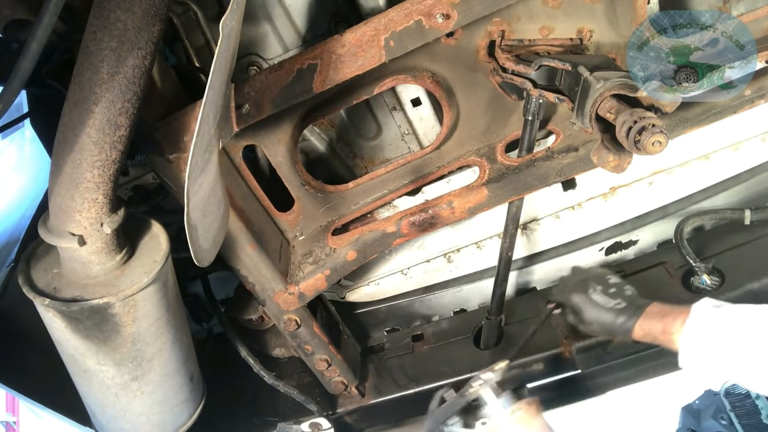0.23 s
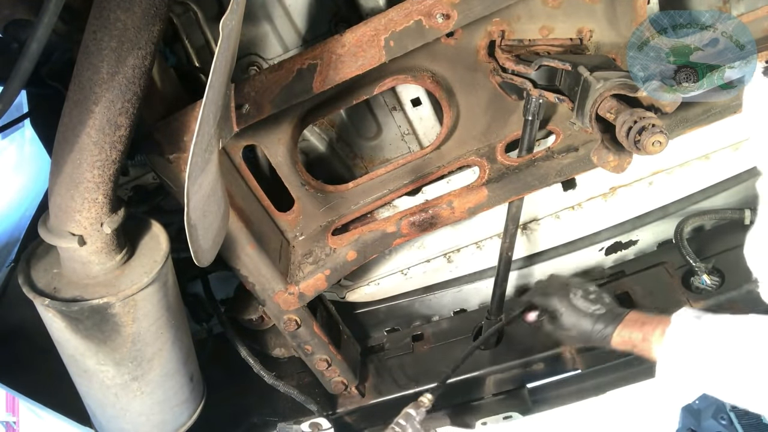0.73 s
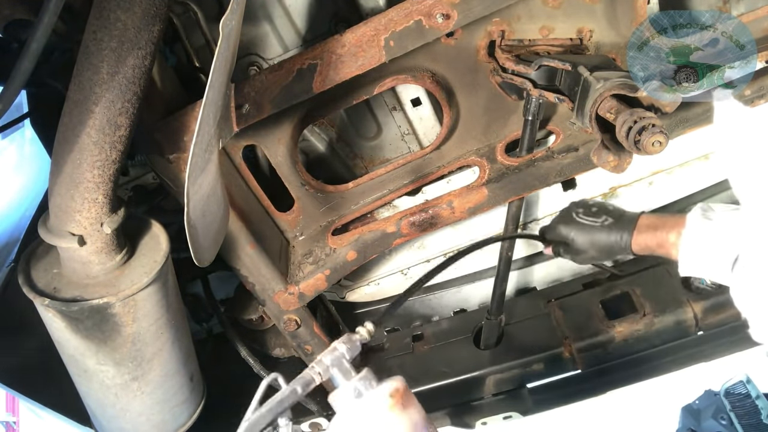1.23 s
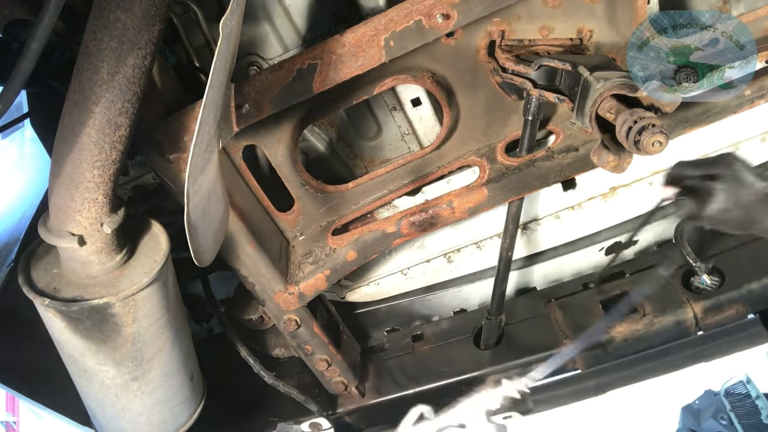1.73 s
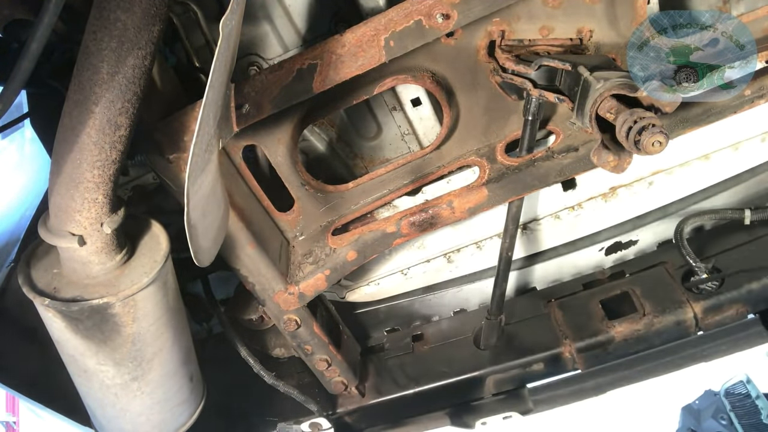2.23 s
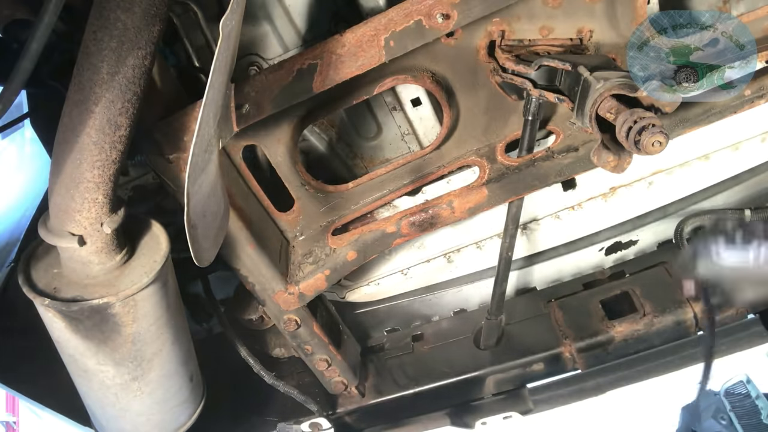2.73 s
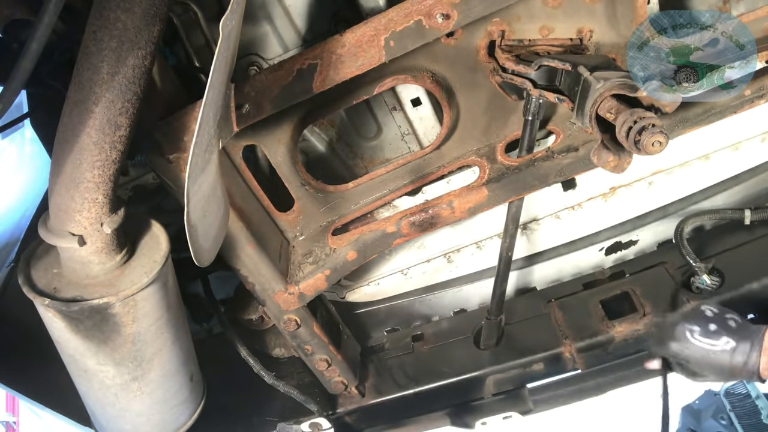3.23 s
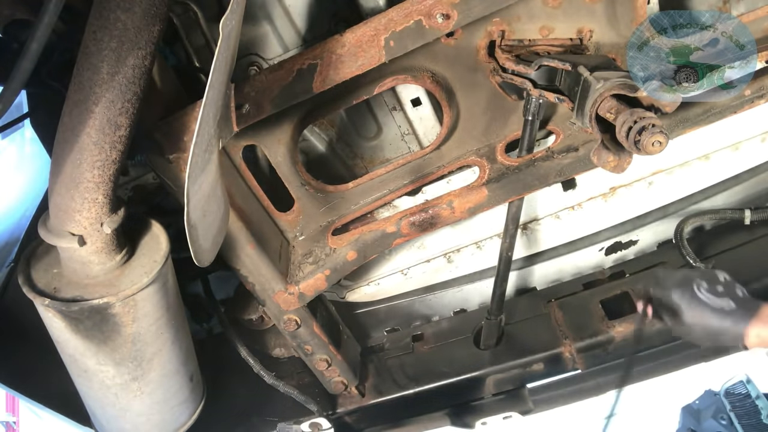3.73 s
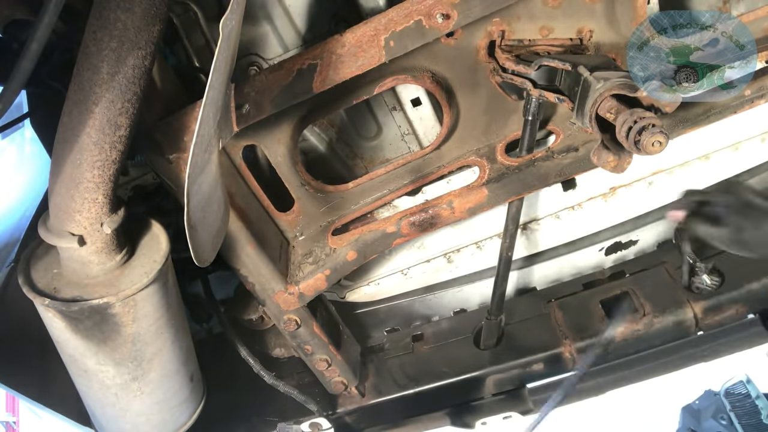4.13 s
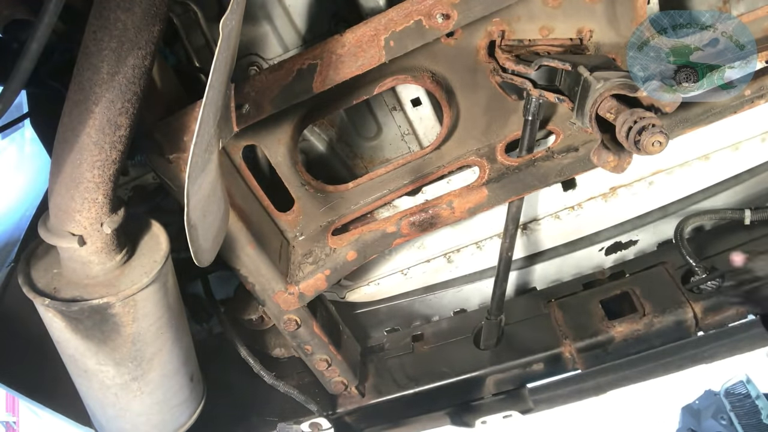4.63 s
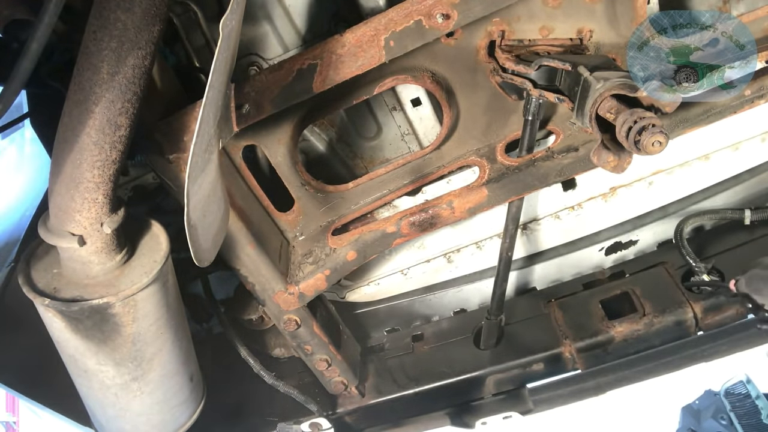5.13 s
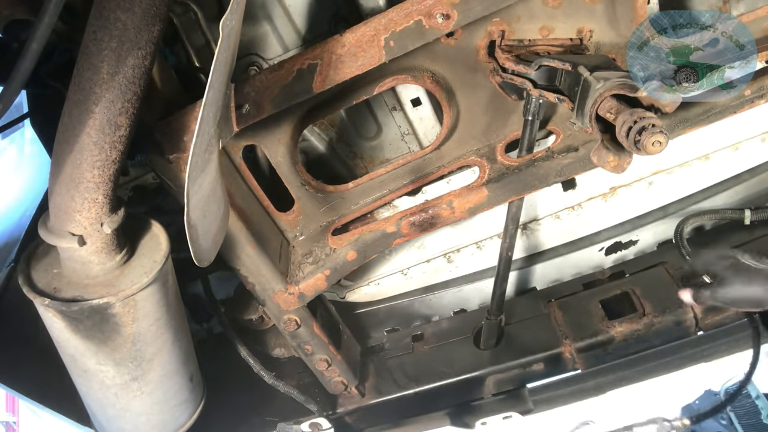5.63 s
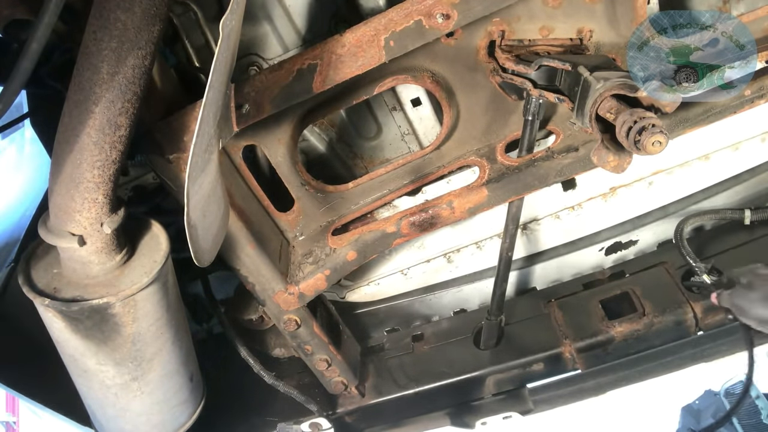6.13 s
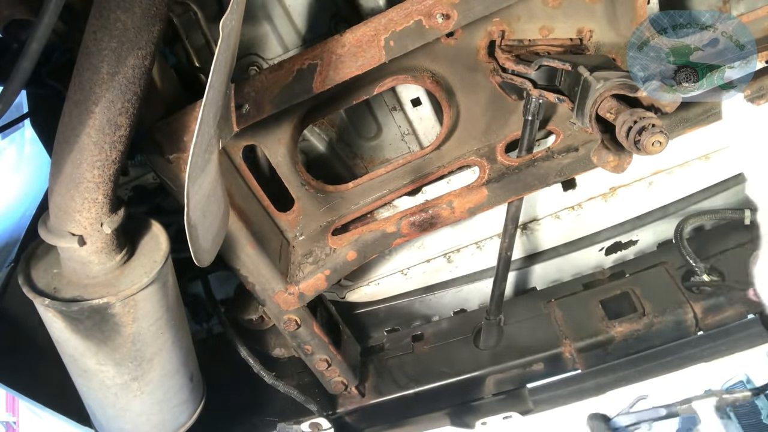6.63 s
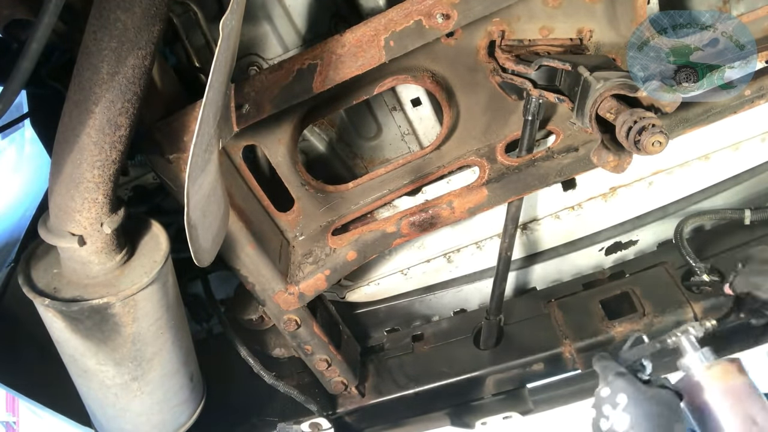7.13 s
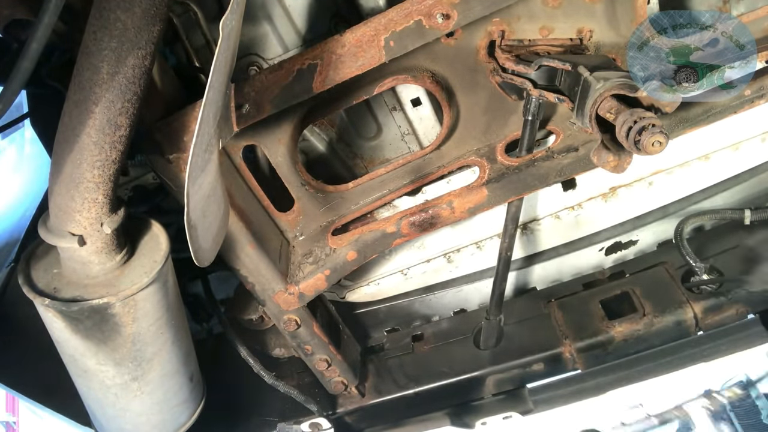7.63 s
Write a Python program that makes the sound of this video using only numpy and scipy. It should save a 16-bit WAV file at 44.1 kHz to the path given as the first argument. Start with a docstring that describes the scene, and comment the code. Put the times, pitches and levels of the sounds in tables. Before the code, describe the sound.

A spray gun blows oil through a flexible wand into a vehicle's hollow steel underside, hissing with a soft splash and gurgle. It stops briefly: air leaks, the hose bumps and the nozzle taps the steel. A longer burst follows, ringing inside the metal with faint whistles. In the next pause a car passes outside, then the spray starts again with a surge. It is heard close up in a garage, in mono.

```python
"""Rust-proofing oil is sprayed through a bendy wand into a vehicle's hollow steel sill, in three bursts.
First the air jet hisses, rings the hollow and splashes on the metal while oil gurgles in the stream.
In the first pause a little air leaks, the hose bumps the body and the nozzle taps the steel.
The second burst goes into holes in the sill. In the next pause air leaks again and a car passes outside
the garage. The last burst reaches deep inside. All is heard close up, in mono."""
import sys
import numpy as np
from scipy import signal
from scipy.fft import rfft, irfft, next_fast_len
from scipy.io import wavfile
from scipy.ndimage import map_coordinates

SR = 44100
rng = np.random.default_rng(int(sys.argv[2]) if len(sys.argv) > 2 else 0)


def dump_mix(stems):
    """Bounce the given channels to the path in sys.argv[1] as a 16-bit WAV at rate SR."""
    frames = np.atleast_2d(stems).T  # one column per channel
    limited = np.clip(frames, -1, 1)  # hard clip at full scale
    pcm = np.round(limited * 32767).astype(np.int16)
    wavfile.write(sys.argv[1], SR, pcm)


N = 347949
TIME = np.arange(N) / SR

# Levels are relative: the functions add their own gains. A spread is half the length of a swell.
# trigger pulls: opening t/s, closing t/s, starting surge/dB
TRIGGER_PULLS = [(-.2, 1.645, -2), (2.129, 5.146, 5), (6.325, 8.1, 9)]
# strength of the jet, one list for each pull: t/s, mist level/dB, hollow level/dB
JET_LEVELS = [
    [(0.02, -26, -25.5), (0.118, -25, -27), (0.314, -25.5, -23.5), (0.354, -25, -27.5), (0.46, -28, -25.5),
     (0.724, -24.5, -24.5), (1.03, -26, -26), (1.338, -26, -23.5), (1.446, -26.5, -24.5),
     (1.538, -24.5, -22), (1.62, -27.5, -26.5)],
    [(2.18, -23.5, -28.5), (2.3, -21.5, -24.5), (2.65, -26, -25), (3.0, -26, -24.5), (3.01, -25.5, -26),
     (3.56, -24.5, -23.5), (3.59, -23, -25.5), (4.05, -27.5, -27), (4.08, -24, -22.5), (4.1, -26, -27),
     (4.39, -27, -29), (4.48, -26.5, -24.5), (4.68, -24.5, -24), (5.12, -24, -23.5)],
    [(6.38, -24, -22.5), (6.396, -25, -22), (6.696, -24.5, -22.5), (6.718, -26.5, -24.5),
     (7.208, -24, -24.5), (7.324, -24, -22.5), (7.398, -24.5, -25.5), (7.586, -25, -25),
     (7.652, -26, -25.5), (7.678, -22, -20), (7.71, -23.5, -24.5), (7.86, -22.5, -24)],
]
# where the nozzle is: t/s, place (0 seam, 1 open, 2 first hole, 3 second hole, 4 deep in that hole)
NOZZLE_PLACE = [(0, 0), (.28, -0.5), (.48, 1), (1.64, 1), (2.1, 2), (4.48, 2), (4.62, 3), (6.69, 3),
                (6.74, 4), (7.89, 4)]
# tone colour of the hiss at those five places: f/Hz, level/dB
SEAM_HISS = [(1410, -17), (2400, -19), (2900, -3), (3600, -3), (4400, -3), (5000, -4.5), (5450, 1.5),
             (6000, -3), (7000, -3), (8000, -7), (10400, -40), (17600, -120)]
OPEN_HISS = [(1410, -27.5), (2400, -5), (3000, -3.5), (3470, -2.5), (3760, -3.5), (4530, -3), (4860, -4.5),
             (5350, -4.5), (6770, -3.5), (8000, -10), (10400, -46), (17600, -120)]
FIRST_HOLE_HISS = [(1410, -23.5), (2400, -7.5), (2720, -11.5), (3260, 4), (3560, 0.5), (4530, 1),
                   (4910, -3.5), (5350, -1), (6510, 0.5), (7270, -3), (8000, -11), (10400, -37),
                   (17600, -120)]
SECOND_HOLE_HISS = [(1410, -28), (2400, -11), (2690, -12), (3150, 1), (3650, 0.5), (3970, 1.5),
                    (4330, -0.5), (4930, -5), (5140, -3.5), (6640, 2), (7340, -5), (8000, -4.5),
                    (10400, -13), (17600, -120)]
DEEP_HISS = [(1410, -44.5), (2400, -16), (2610, -15), (2690, -15), (2760, -5.5), (3230, 2), (3500, -2),
             (3650, 1.5), (3910, -3), (4140, 1.5), (4740, -5), (5710, -1.5), (6510, -0.5), (7340, -4.5),
             (8000, -14), (10400, -32), (17600, -120)]
# colours of oil mist, of a splash on bare metal and of one inside the sill: f/Hz, level/dB
MIST_COLOUR = [(6500, -30), (7600, 0.5), (8300, 0.5), (9200, 2), (10000, 1), (10450, -4), (11000, 2.5),
               (11600, 3), (13500, 1.5), (15800, -0.5)]
BARE_SPLASH = [(260, -31.5), (450, -16), (568, -13.5), (700, -9), (838, -11), (981, -6), (1830, -4.5),
               (2160, -6), (2450, -2), (2700, -9.5), (3510, -16), (5940, -120)]
MUFFLED_SPLASH = [(280, -30), (480, 1), (575, -9.5), (655, -3.5), (751, -12), (819, -1.5), (989, -5.5),
                  (1060, -4.5), (1220, -0.5), (1420, -14.5), (1580, 0), (1870, -6.5), (2240, -5),
                  (2480, -5.5), (2700, -0.5), (3510, -27), (5940, -120)]
# pitches at which the sill rings, and dips between them: f/Hz, width/Hz, lift/dB
SILL_RESONANCES = [(960, 44, 8.5), (1350, 190, -4.5), (1552, 73, 5.5), (1940, 57, 5), (2290, 31, 8.5),
                   (2900, 50, 6), (3300, 180, 2.5), (3960, 86, 0.5), (4270, 110, -1), (4440, 63, 0),
                   (5210, 43, 4.5), (6800, 250, 2.5)]
# how squarely the jet meets the metal: t/s, splash level/dB against the hollow
JET_AIM = [(0, -13.5), (.25, -14), (.43, -7), (.7, -7), (1.05, -4), (1.2, -12.5), (1.35, -7.5),
           (1.64, -9.5), (2.15, -10.5), (2.65, -14), (2.9, -10), (3.2, -16.5), (3.7, -15.5), (4.3, -9.5),
           (4.7, -18), (6.4, -16), (6.85, -16), (7.89, -15)]
# the oil at each of the five places: steady gurgle level/dB, hoot f/Hz, purity of a strong hoot (0-1)
OIL_AT_PLACE = [(-43, 385, 0.99), (-47, 385, 0.88), (-38, 352, .68), (-38, 358, 0.49), (-40.5, 370, 0.45)]
# colour of the gurgle: f/Hz, level/dB
GURGLE_COLOUR = [(25, -34), (70, -24.5), (140, -15), (220, -8.5), (290, -1.5), (355, -2), (420, 1),
                 (520, -11), (700, -15), (1500, -24)]
# lumps of oil that swell the gurgle: t/s, level/dB, spread/s
OIL_LUMPS = [(0.31, -33, 0.031), (0.374, -15.5, 0.014), (0.427, -31.5, .02), (0.459, -23.5, 0.0082),
             (0.678, -35.5, 0.013), (1.593, -36, 0.075), (2.208, -32.5, 0.048), (2.377, -24, 0.024),
             (2.45, -31.5, 0.074), (3.317, -23.5, 0.014), (3.397, -16.5, .008), (3.47, -26, 0.073),
             (3.615, -30.5, 0.021), (4.142, -31.5, 0.018), (4.275, -30, 0.02), (4.579, -24, 0.014),
             (4.966, -25.5, 0.027), (6.567, -28.5, 0.061), (6.679, -26, 0.03), (6.877, -29, 0.026),
             (7.033, -23.5, 0.028), (7.282, -33.5, 0.13), (7.429, -23, 0.0081), (7.75, -26.5, 0.067),
             (7.874, -25, 0.013)]
# echo of the garage: f/Hz, time to fade by 60 dB/s
ECHO_FADE = [(100, 0.3), (1000, 0.21), (6000, 0.1), (15000, 0.073)]
# colour of the garage's background noise: f/Hz, level/dB
GARAGE_COLOUR = [(25, -10), (60, 2), (150, -2), (350, -4.5), (700, -6), (1100, -8), (2000, -11), (6000, -9),
                 (15000, -22)]
# the jet catches a rim and whistles: t/s, level/dB, spread/s, f/Hz
RIM_WHISTLES = [(.07, -34, .07, 5350), (0.252, -29.5, 0.057, 5480), (.2, -33, .02, 7800),
                (1.006, -28, 0.026, 2480), (1.33, -30, 0.037, 2500), (2.335, -33, 0.051, 1500),
                (2.988, -27.5, 0.033, 3150), (3.45, -38, 0.085, 3270), (3.79, -32, .05, 3400),
                (3.22, -35, .05, 4000), (4.538, -35, 0.03, 1530), (4.75, -32.5, 0.18, 4300),
                (6.42, -30.5, 0.14, 3100), (7.02, -31, 0.021, 6080), (7.313, -27.5, 0.034, 2190)]
# thumps of stray air: t/s, level/dB, spread/s
AIR_PUFFS = [(0.16, -48, .025), (5.063, -44, 0.022), (5.166, -39, .02), (7.015, -38, 0.032)]
# their colour: f/Hz, level/dB
PUFF_COLOUR = [(20, -15), (50, -3), (100, -7), (190, -4.5), (400, -24), (1200, -60)]
# the jet crosses a pocket in the metal: t/s, level/dB, spread/s, f/Hz, width/Hz
POCKET_SPLASHES = [(0.432, -36, .012, 1600, 1810), (.81, -36, 0.088, 2000, 350),
                   (1.593, -30.5, 0.061, 820, 650), (2.38, -31, 0.022, 810, 600),
                   (2.517, -33, 0.039, 1190, 500), (3.47, -30.5, 0.067, 900, 700),
                   (4.076, -35, 0.011, 2400, 2200), (4.463, -36, .04, 1130, 400),
                   (4.58, -31, 0.0091, 1010, 500), (6.45, -39, 0.059, 900, 700),
                   (7.047, -32.5, 0.029, 800, 600), (7.276, -25, 0.026, 1100, 2200),
                   (7.348, -25.5, 0.026, 1200, 2400)]
# the hose slides over the body: t/s, level/dB, spread/s, f/Hz, width/Hz
HOSE_RUBS = [(1.675, -45, .02, 6100, 2000), (1.6, -43, 0.011, 2150, 960), (2.115, -44.5, 0.012, 2400, 1700),
             (5.38, -48.5, 0.064, 3900, 2200), (5.37, -48, .035, 1360, 700)]
# leaking air: t/s, level/dB
LEAK_LEVELS = [(1.64, -42), (1.72, -48), (1.86, -48.5), (1.97, -41), (2.12, -46.5), (5.17, -54),
               (5.28, -53), (5.34, -44), (5.47, -46), (5.5, -50), (5.56, -43), (5.59, -64.5), (6.26, -56),
               (6.32, -44)]
# its colour: f/Hz, level/dB
LEAK_COLOUR = [(1350, -50), (2300, -11), (3580, -3), (3820, -18), (4280, -7), (4830, -15), (5910, -7),
               (6300, -2), (7230, -6), (8700, -5.5), (9900, -1.5), (13300, -6), (15800, -7.5)]
# the hose bumps the body: t/s, level/dB, f/Hz
HOSE_BUMPS = [(1.708, -38, 1260), (1.710, -42, 650), (2.025, -36.5, 596), (2.114, -36, 543)]
# the nozzle taps the steel: t/s, level/dB, rise/s
NOZZLE_TAPS = [(1.903, -15.5, 0.0042), (1.950, -23, 0.0059), (1.991, -31, .005)]
# ringing tones of the steel: f/Hz, level/dB, time to fade by 60 dB/s
STEEL_TONES = [(2280, -2, 0.053), (2630, -10, 0.035), (2850, -17, 0.047), (3140, -9, 0.033),
               (3460, -10, 0.049), (3640, -7, 0.045), (3876, -17, 0.05), (4630, -14, 0.055),
               (5800, -20, 0.071), (5800, -9, 0.022), (6342, -23, 0.11), (9265, -36, 0.1),
               (9690, -19, 0.065), (10000, -18, 0.066)]
# colour of the crack of a tap: f/Hz, level/dB
CRACK_COLOUR = [(240, -74), (400, -37), (907, -20), (1060, -16), (2120, -15), (2740, 0), (4880, -17),
                (5860, -13), (8180, -19), (15000, -36)]
# the passing car's engine note: t/s, firing f/Hz, level/dB
ENGINE_NOTE = [(4.9, 105, -69), (5.25, 104.6, -50), (5.42, 105, -43), (5.6, 100.2, -42), (5.8, 88.5, -40),
               (5.97, 76, -35), (6.1, 62, -39), (6.35, 58, -46), (6.7, 57, -68), (7.2, 56.7, -77)]
# the car's noise: t/s, rumble level/dB, tyre level/dB
CAR_LEVELS = [(5.18, -51, -53), (5.22, -52, -54), (5.36, -46, -47), (5.594, -38, -44),
              (5.982, -30.5, -31.5), (6.14, -38, -43), (6.21, -42, -39.5), (6.31, -42.5, -47)]
# colours of its rumble and tyres: f/Hz, level/dB
RUMBLE_COLOUR = [(15, -41), (25, -8), (59, -1), (86, -1.5), (140, -4), (230, -1), (365, -8), (420, -23),
                 (550, -43.5), (920, -120)]
TYRE_COLOUR = [(180, -30), (300, -8.5), (457, -6.5), (502, -8), (565, -5.5), (806, -4.5), (1420, -17),
               (1710, -21), (2930, -25.5), (3390, -25), (7000, -47), (9100, -78), (15400, -120)]


def amp(db):
    """Turn decibels into a gain."""
    return 10 ** (np.asarray(db) / 20)


def unit(x):
    """Scale to an average power of 1."""
    return x / np.sqrt(np.mean(x ** 2) + 1e-20)


def along(points, hz):
    """Read between (f/Hz, value) points on a log frequency axis."""
    f, values = np.transpose(points)
    return np.interp(np.log(hz + 1), np.log(f + 1), values)


def curves(rows):
    """One value per sample for each column after the time."""
    times, *columns = np.transpose(rows)
    return [np.interp(TIME, times, column) for column in columns]


def wobble(rate):
    """A smooth curve through `rate` random values a second."""
    return unit(map_coordinates(rng.standard_normal(int(N * rate / SR) + 4), [TIME * rate]))


def filtered(x, response):
    """Scale each frequency in x by the gain response(hz)."""
    size = next_fast_len(N + SR // 2)
    return irfft(rfft(x, size) * response(np.fft.rfftfreq(size, 1 / SR)), size)[..., :N]


def noise(colour):
    """Noise with the given tone colour."""
    return unit(filtered(rng.standard_normal(N), lambda hz: amp(along(colour, hz))))


def bell(hz, centre, width):
    """The hump of one resonance: 1 at its centre, less to each side."""
    return 1 / (1 + (2 * (hz - centre) / width) ** 2)


def band(x, centre, width):
    """The part of x around one pitch, at power 1."""
    return unit(filtered(x, lambda hz: bell(hz, centre, width)))


def narrow(centre, width):
    """Noise around one pitch."""
    return band(rng.standard_normal(N), centre, width)


def swell(s, spread):
    """A smooth rise and fall around time s."""
    return np.exp(-.5 * ((TIME - s) / spread) ** 2)


def strike(t, rise, fade):
    """A quick rise to 1, then a drop of 60 dB every `fade` seconds."""
    t = np.maximum(t, 0)
    shape = (1 - np.exp(-(t / rise) ** 2)) * amp(-60 * t / fade)
    return shape / shape.max()


def valve(rise_s=0.0044, fall_s=0.0048, surge_s=0.016):
    """Air flow, 1 when steady; stored pressure makes the later pulls start with a surge."""
    flow = np.zeros(N)
    for opens, closes, surge_db in TRIGGER_PULLS:
        t = np.maximum(TIME - opens, 0)
        opening = np.minimum(t / rise_s, 1) ** 2
        closing = np.exp(-np.maximum(TIME - closes, 0) / fall_s)
        flow += opening * amp(surge_db * np.exp(-t / surge_s)) * closing
    return flow


def in_sill(x):
    """The closed steel box boosts the pitches at which it rings."""
    lift_db = lambda hz: sum(db * bell(hz, centre, width) for centre, width, db in SILL_RESONANCES)
    return unit(filtered(x, lambda hz: amp(lift_db(hz))))


def off_panels(x, strength, sway_s, count=10):
    """Nearby panels reflect the jet; the delays drift as the hand moves."""
    out = x.copy()
    for delay_s in rng.uniform(0.000999, .009, count):
        path_s = delay_s + sway_s * wobble(1.5)
        out += strength * wobble(5) * map_coordinates(x, [(TIME - path_s) * SR], order=3)
    return out / np.sqrt(1 + count * strength ** 2)


def swirl(x, depth_db, patch_hz, patch_s):
    """The wandering jet makes narrow bands louder and softer at random."""
    hz, t, spectrum = signal.stft(x, SR, nperseg=512)
    grid = np.meshgrid(hz / patch_hz, t / patch_s, indexing='ij')
    patches = map_coordinates(rng.standard_normal((256, 256)), grid, mode='mirror')
    return signal.istft(spectrum * unit(amp(depth_db * patches)), SR, nperseg=512)[1][:N]


def splashing(bare):
    """Oil lands: bright on bare metal (share 0-1), hollow inside the sill."""
    on_metal = off_panels(noise(BARE_SPLASH), strength=0.22, sway_s=0.00021)
    return np.sqrt(bare) * on_metal + np.sqrt(1 - bare) * in_sill(noise(MUFFLED_SPLASH))


def spray():
    """The jet: fine mist, the ringing hollow and the splash, all fluttering with the oil in the air."""
    mist_db, hollow_db = curves(np.vstack(JET_LEVELS))
    place, = curves(NOZZLE_PLACE)
    aim_db, = curves(JET_AIM)
    nearness = lambda k: np.maximum(1 - abs(place - k), 0)
    hisses = [noise(SEAM_HISS), noise(OPEN_HISS)]
    hisses += [in_sill(noise(hole)) for hole in (FIRST_HOLE_HISS, SECOND_HOLE_HISS, DEEP_HISS)]
    hollow = sum(np.sqrt(nearness(k)) * hiss for k, hiss in enumerate(hisses))
    mist = amp(mist_db + 1.05) * noise(MIST_COLOUR)
    air = off_panels(mist + amp(hollow_db + 0.06) * hollow, strength=0.093, sway_s=.00008)
    # in the open the oil lands on bare metal; elsewhere the splash is mostly muffled
    bare = np.clip(.1 + nearness(0.96), 0, 1)
    splash = amp(hollow_db + aim_db + 1.5 + 0.85 * wobble(12)) * splashing(bare)
    splash += pockets(splashing(np.clip(bare + 0.36, 0, 1)))
    flutter_db = 0.24 * wobble(45) + 0.64 * wobble(400)
    jet = air + amp(0.77 * wobble(130)) * splash
    return amp(flutter_db) * swirl(jet, depth_db=1.5, patch_hz=241.4, patch_s=.09)


def gurgle():
    """Lumps of oil break up the stream and hoot at a low pitch."""
    place, = curves(NOZZLE_PLACE)
    steady_db, hoot_hz, purity = [np.interp(place, range(5), col) for col in np.transpose(OIL_AT_PLACE)]
    lump_power = sum((amp(db) * swell(s, spread)) ** 2 for s, db, spread in OIL_LUMPS)
    oil_db = 10 * np.log10(amp(steady_db + 1.5 * wobble(14)) ** 2 + lump_power)
    phase = 2 * np.pi * np.cumsum(hoot_hz * (1 + 0.0592 * wobble(130))) / SR
    hoot = unit(amp(2.1 * wobble(60)) * np.sin(phase))
    burble = unit(amp(0.93 * wobble(90)) * noise(GURGLE_COLOUR))
    # the harder the resonance is driven, the purer it sounds
    hoot_share = purity * np.clip((oil_db + 48) / 21, .1, 1)
    return amp(oil_db + 0.17) * (np.sqrt(hoot_share) * hoot + np.sqrt(1 - hoot_share) * burble)


def garage_echo(x):
    """The walls give a short echo whose high notes fade first."""
    hz, t, spectrum = signal.stft(rng.standard_normal(SR // 2), SR, nperseg=256)
    fading = amp(-60 * t / along(ECHO_FADE, hz)[:, None])
    tail = signal.istft(spectrum * fading, SR, nperseg=256)[1]
    return signal.fftconvolve(x, tail / np.linalg.norm(tail))[:N]


def whistles(width_hz=230):
    """Each rim that the jet catches sings briefly around one pitch."""
    return sum(amp(db) * swell(s, spread) * narrow(hz, width_hz) for s, db, spread, hz in RIM_WHISTLES)


def puffs():
    """Stray air reaches the microphone as soft thumps."""
    return noise(PUFF_COLOUR) * sum(amp(db) * swell(s, spread) for s, db, spread in AIR_PUFFS)


def pockets(splash):
    """Each pocket that the jet crosses swells the splash around its own pitch."""
    return sum(amp(db) * swell(s, spread) * band(splash, hz, width)
               for s, db, spread, hz, width in POCKET_SPLASHES)


def hose_rubs():
    """The hose slides over the body with brief swishes."""
    return sum(amp(db) * swell(s, spread) * narrow(hz, width) for s, db, spread, hz, width in HOSE_RUBS)


def leak():
    """A little air keeps escaping, heard between the bursts."""
    leak_db, = curves(LEAK_LEVELS)
    return amp(leak_db + 0.87 * wobble(100)) * noise(LEAK_COLOUR)


def hose_bumps():
    """The soft hose hits the body with dull thuds."""
    return sum(amp(db - 2) * strike(TIME - s, rise=0.0042, fade=0.095) * narrow(hz, 0.73 * hz)
               for s, db, hz in HOSE_BUMPS)


def nozzle_taps():
    """The nozzle bounces on the steel; each hit cracks and rings."""
    out = np.zeros(N)
    t = np.arange(SR // 4) / SR
    crack = noise(CRACK_COLOUR)
    for s, db, rise in NOZZLE_TAPS:
        start = round(s * SR)
        span = slice(start, start + len(t))
        ring = np.zeros(len(t))
        for hz, tone_db, fade in STEEL_TONES:
            loudness = amp(tone_db + rng.normal(0, 2.4)) * strike(t, rise, fade)
            ring += loudness * np.sin(2 * np.pi * (hz * t + rng.random()))
        out[span] += amp(db - 5.5) * ring / abs(ring).max()
        out[span] += amp(db - 8) * strike(t, rise, fade=0.035) * crack[span]
    return out


def passing_car():
    """Tyres and exhaust swell and fade; the engine note drops as the car goes by."""
    rumble_db, tyre_db = curves(CAR_LEVELS)
    firing_hz, engine_db = curves(ENGINE_NOTE)
    # the noise falls away by 35 dB a second on either side of the pass
    far_db = -35 * (np.maximum(5.18 - TIME, 0) + np.maximum(TIME - 6.31, 0))
    phase = 2 * np.pi * np.cumsum(firing_hz * (1 + 0.0095 * wobble(25))) / SR
    note = unit(np.sin(phase) + 0.34 * np.sin(2 * phase) + .15 * np.sin(3 * phase))
    engine = amp(engine_db + 1.1 * wobble(10)) * note
    rumble = amp(rumble_db + far_db - 0.5) * noise(RUMBLE_COLOUR)
    tyres = amp(tyre_db + far_db + 2) * noise(TYRE_COLOUR)
    return engine + rumble + tyres


def scene():
    """The work under the vehicle, the street outside and the still air of the garage."""
    work = valve() * (spray() + gurgle() + whistles())
    work += leak() + nozzle_taps() + hose_bumps() + hose_rubs()
    mono = work + amp(-17) * garage_echo(work) + puffs() + passing_car()
    mono += amp(-51.5) * noise(GARAGE_COLOUR)
    return np.array([mono, mono])


def record(dry, top_hz=15790):
    """Cut off the very highest treble."""
    return filtered(dry, lambda hz: hz < top_hz)


dry = scene()
out = record(dry)
dump_mix(out)
```